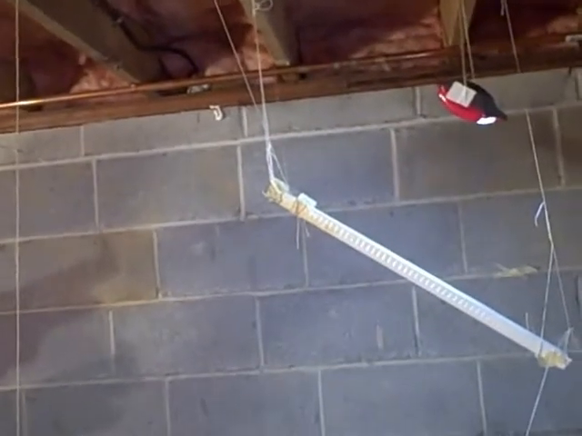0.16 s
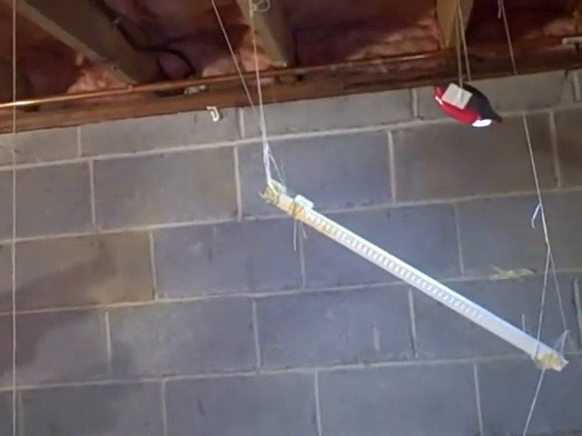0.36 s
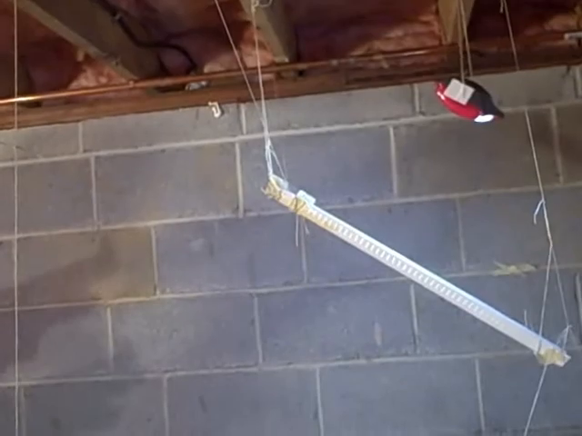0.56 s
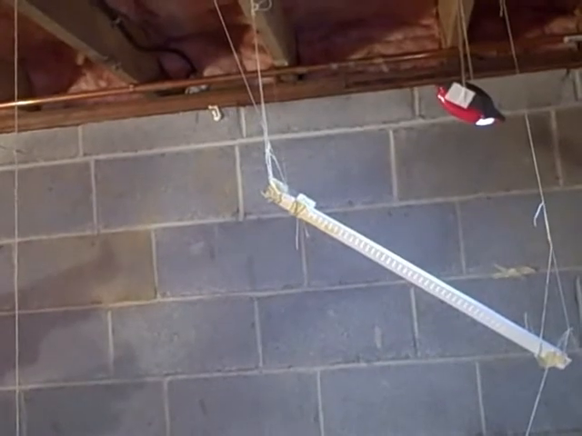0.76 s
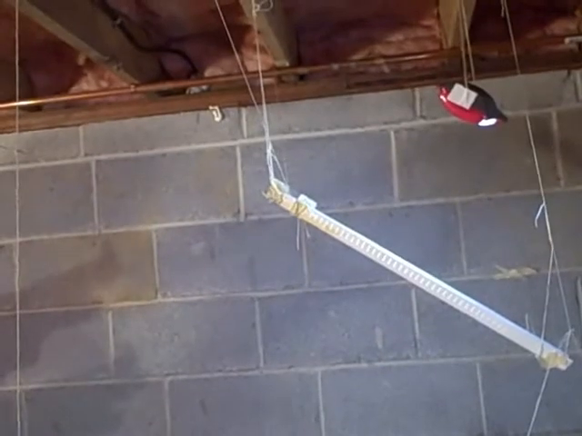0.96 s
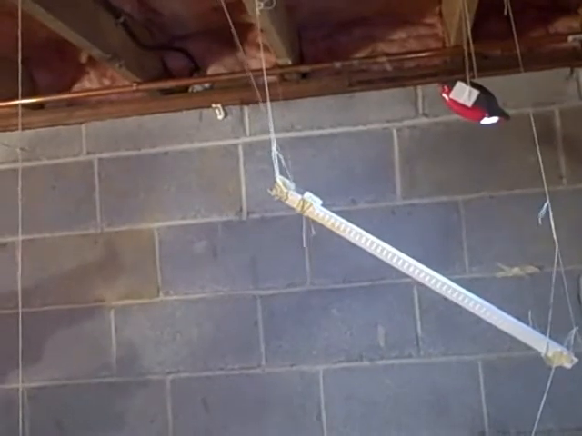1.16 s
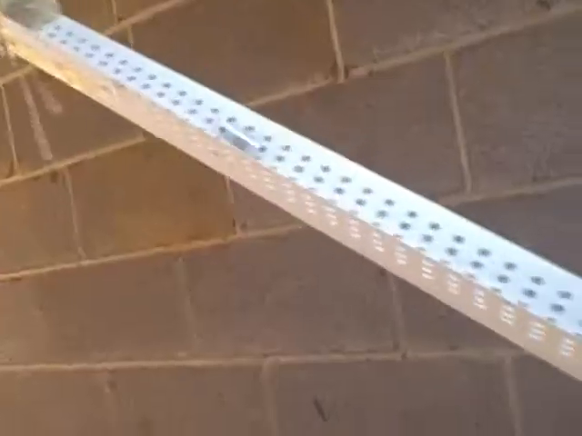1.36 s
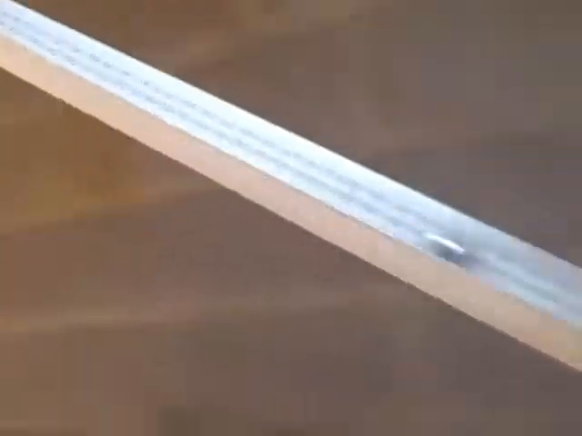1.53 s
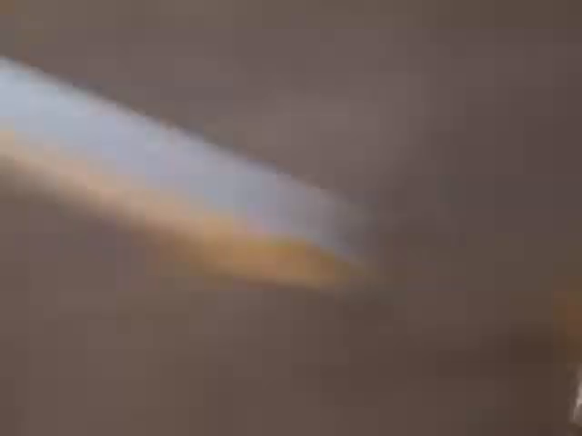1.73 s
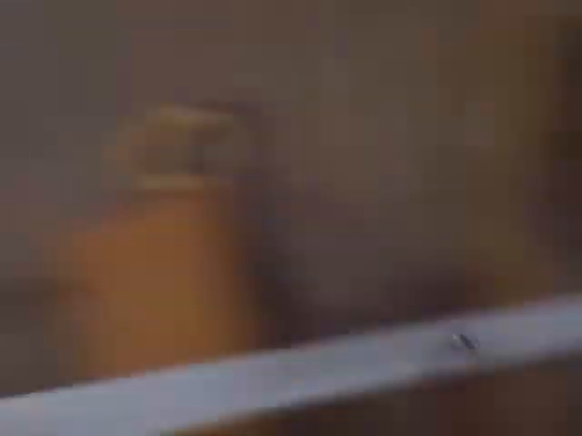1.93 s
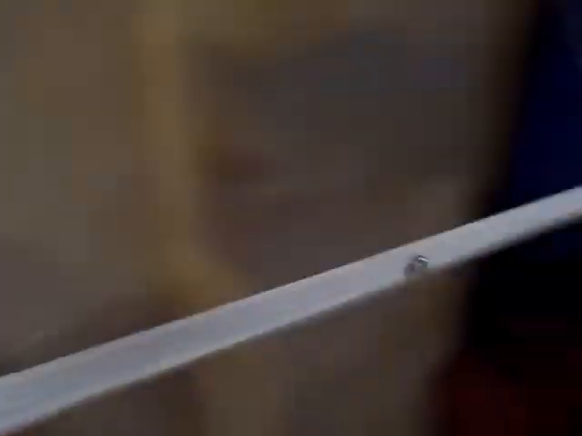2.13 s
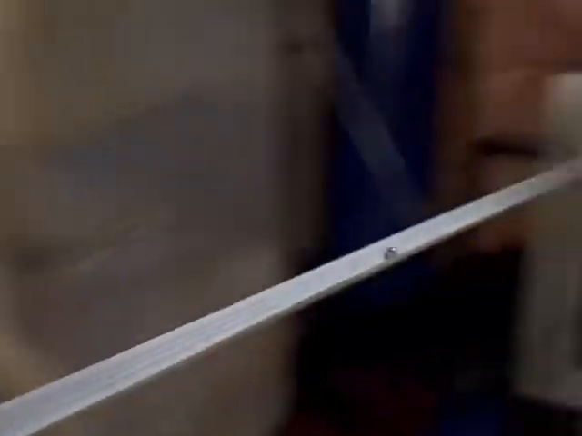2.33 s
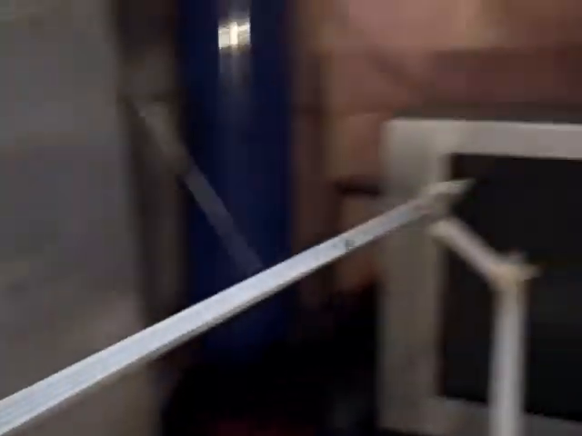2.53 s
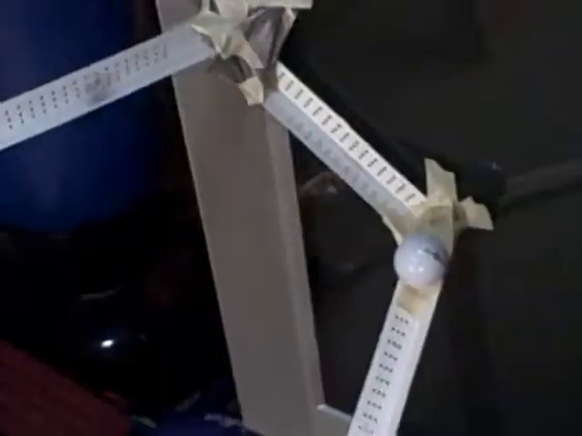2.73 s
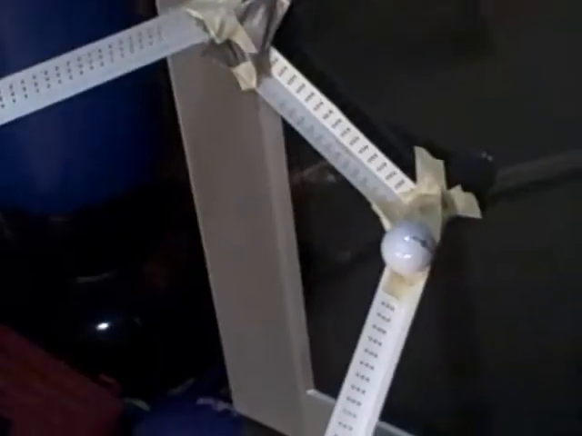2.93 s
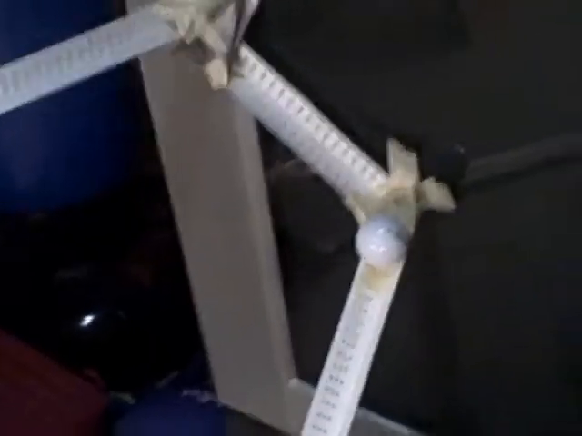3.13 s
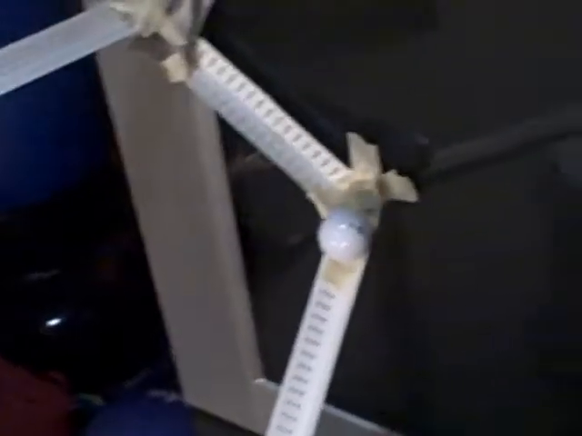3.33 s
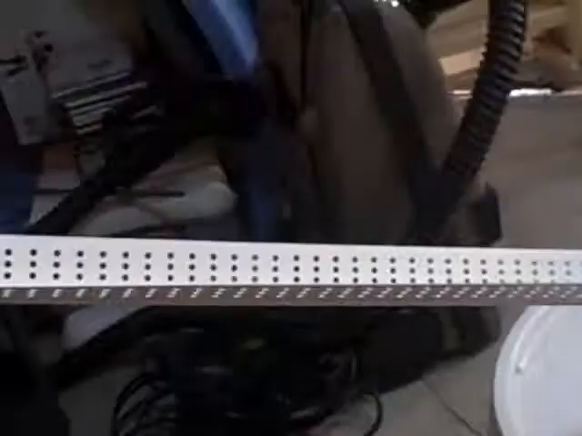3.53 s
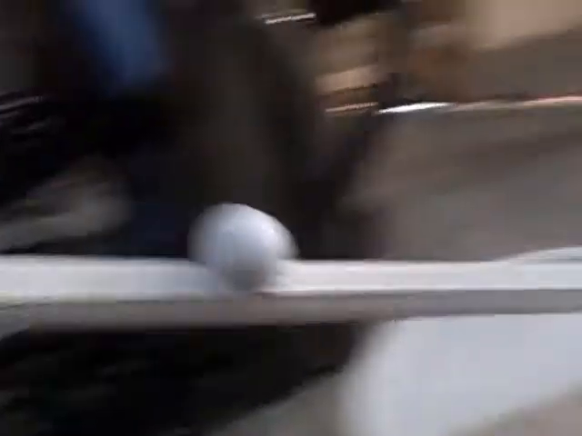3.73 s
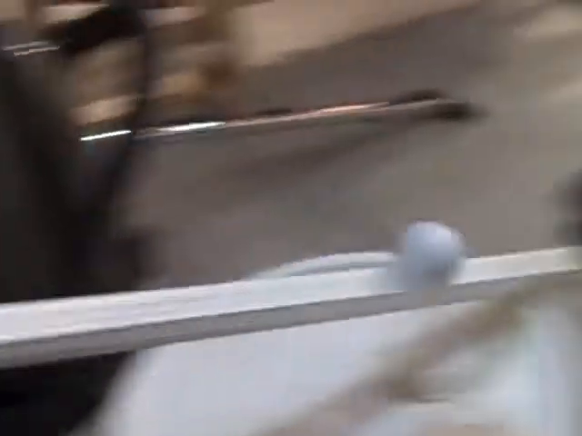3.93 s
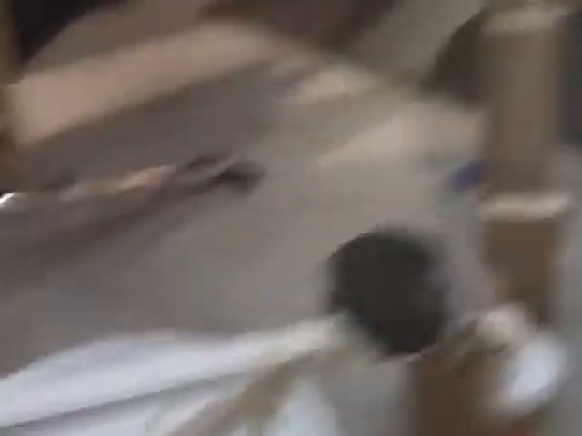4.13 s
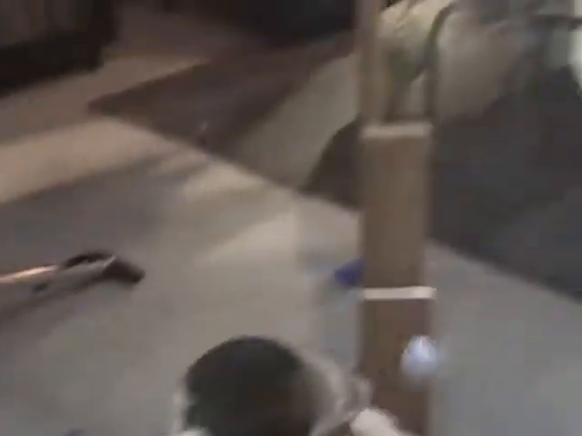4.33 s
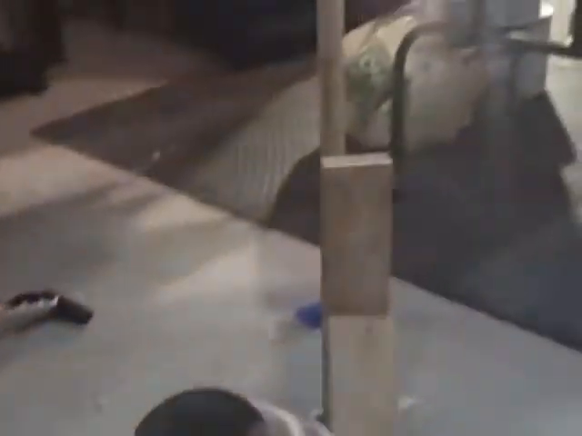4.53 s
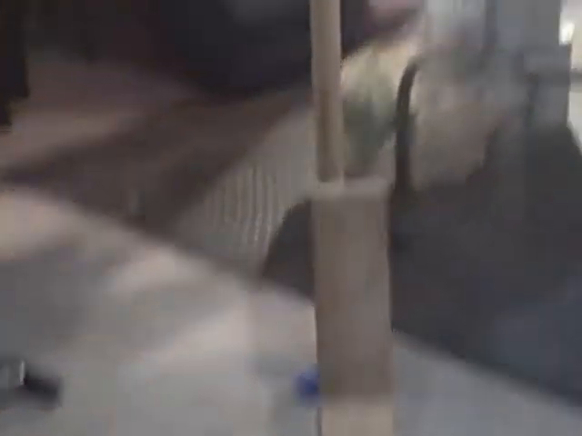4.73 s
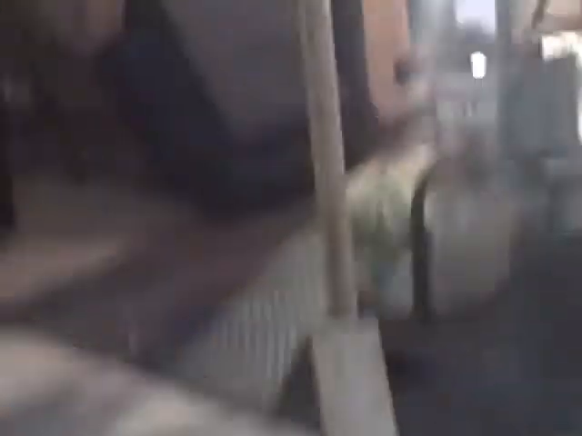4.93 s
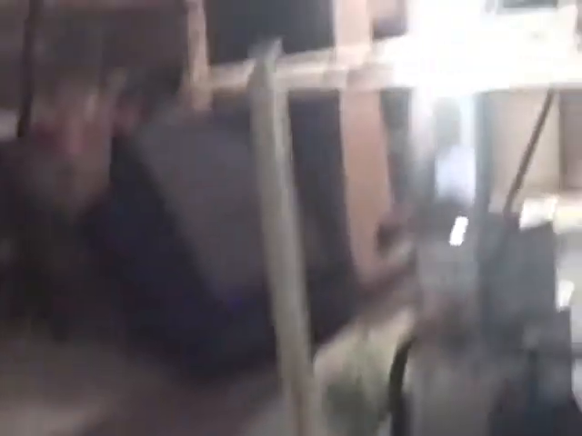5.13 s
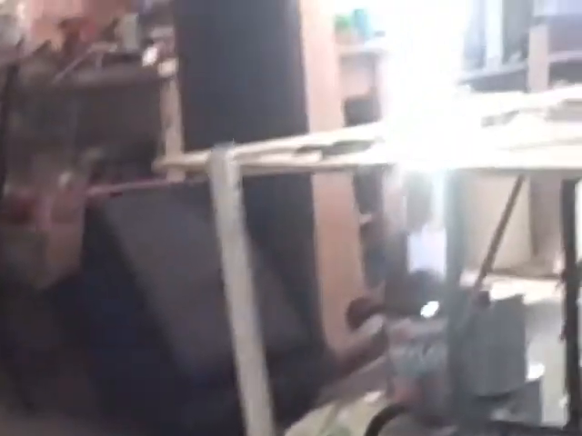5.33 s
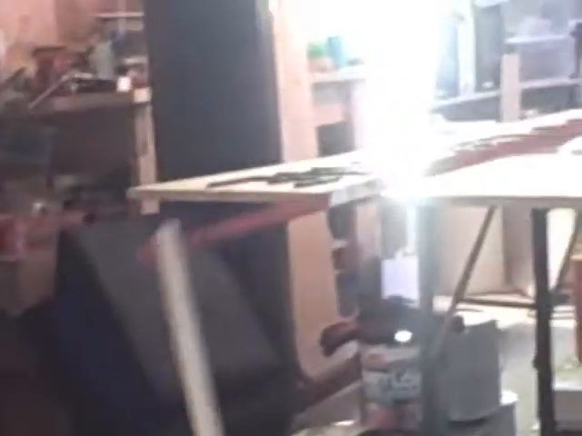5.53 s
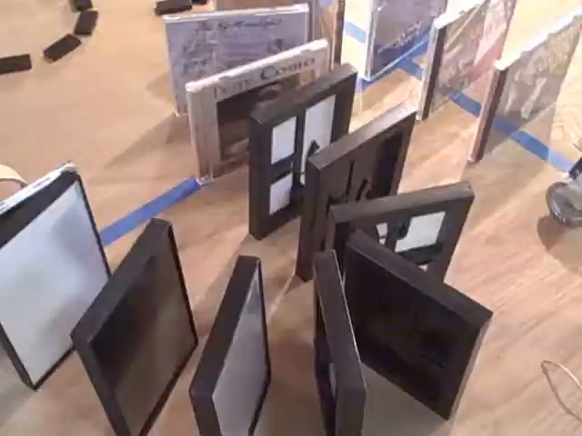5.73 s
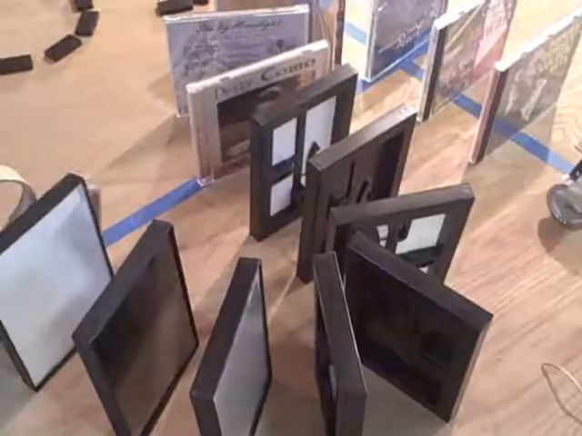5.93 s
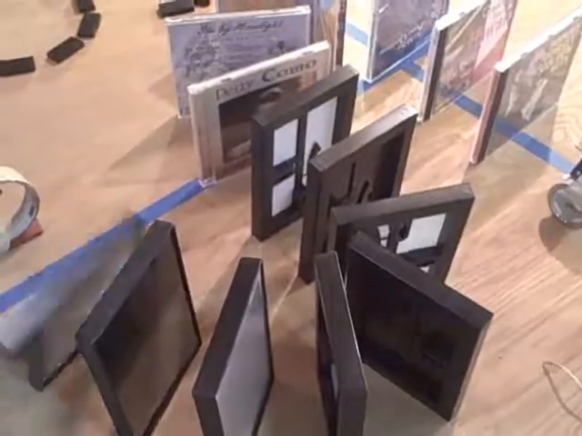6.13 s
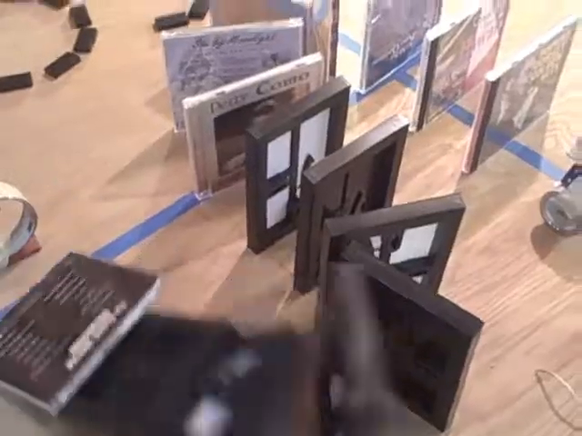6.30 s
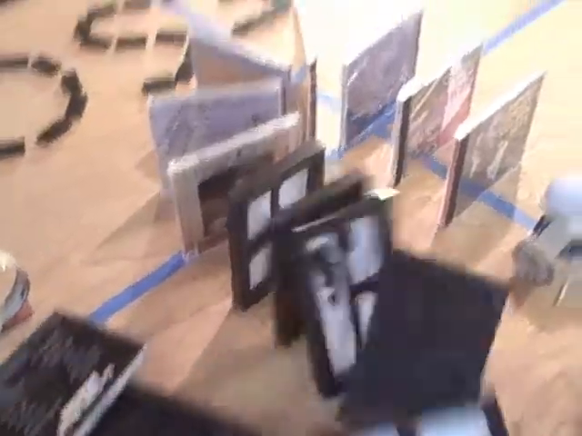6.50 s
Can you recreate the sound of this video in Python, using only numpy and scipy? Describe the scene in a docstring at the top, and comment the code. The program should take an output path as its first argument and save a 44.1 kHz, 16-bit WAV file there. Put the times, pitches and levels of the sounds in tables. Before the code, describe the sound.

Near-silent basement, a catch snaps, balls buzz and tap along rails, wooden pieces knock and slide, and a row of hollow cases slaps down.

```python
"""A home-made chain reaction in a basement, over faint room tone. Dry ticks, then a catch snaps open: shaped
noise bursts and decaying modes. A steel ball taps the holes of plastic rails, nudges a golf ball, and the frame
thumps with falling pitch. The golf ball patters and hums into a lever; blocks and a stick knock, squeak and slip
on a board as grit through modes. A case tips, and a row of plastic cases clatters down, loud, with more room
around it than the rails have."""
import sys
import numpy as np
from scipy import signal
from scipy.fft import rfft, irfft
from scipy.io import wavfile
from scipy.ndimage import uniform_filter1d, map_coordinates

SR = 44100
rng = np.random.default_rng(int(sys.argv[2]) if len(sys.argv) > 2 else 0)


def store_pcm(level_fs):
    """Save levels as 16-bit WAV."""
    pcm = np.round(np.clip(level_fs, -1, 1) * 32767).astype(np.int16)
    wavfile.write(sys.argv[1], SR, np.atleast_2d(pcm).T)


N = 293706
TIME = np.arange(N) / SR  # s


def undb(db):
    """Decibels to gain."""
    return 10 ** (np.asarray(db) / 20)


def unit(x):
    """Scale to rms 1."""
    return x / np.sqrt(np.mean(x ** 2) + 1e-20)


def decay(t, t60):
    """Exponential decay that reaches -60 dB at t60."""
    return np.exp(-np.log(1000) * t / t60)


def add(out, s, x):
    """Mix a sound in at time s."""
    i = int(s * SR)
    out[i:i + len(x)] += x[:N - i]


def through(x, response):
    """Pass a sound through an impulse response."""
    return signal.fftconvolve(x, response)[:len(x)]


def body(points, size=2048):
    """Minimum-phase impulse response with a spectrum of (Hz, dB) points."""
    hz, db = np.transpose(points)
    grid = np.maximum(np.fft.rfftfreq(size, 1 / SR), 1)
    cepstrum = irfft(np.log(undb(np.interp(np.log(grid), np.log(hz), db))))
    # fold the cepstrum onto positive time
    cepstrum[1:size // 2] *= 2
    cepstrum[size // 2 + 1:] = 0
    return irfft(np.exp(rfft(cepstrum)))


def ring(modes, scatter_db=0., detune=0.):
    """Decaying modes with random signs; strengths and pitches may scatter."""
    t = TIME[:SR // 2]
    tones = np.zeros(len(t))
    for hz, db, t60 in modes:
        strength, shift, sign = rng.standard_normal(3)
        envelope = undb(db + scatter_db * strength - 60 * t / t60)
        tones += envelope * np.sign(sign) * np.sin(2 * np.pi * hz * (1 + detune * shift) * t)
    return tones * np.minimum(1, 10 * (t[-1] - t))  # fade over the last 0.1 s


def contact(t60, snap, rough, rise, hold):
    """Force of a blow: one sharp touch, then chatter that dies; its energy is that of 20 ms at rms 1."""
    t = TIME[:SR // 4]
    noise, steps = rng.standard_normal((2, len(t)))
    age = t / max(t60, .002)
    envelope = (1 - np.exp(-age / rise)) * decay(age ** hold, 1)
    unevenness = np.exp(rough * np.repeat(steps, 16)[:len(t)])
    chatter = noise * unevenness * envelope
    force = chatter / np.linalg.norm(chatter)
    force[0] = snap
    return force / np.linalg.norm(force) * np.sqrt(.02 * SR)


def grit(rate, spread_db):
    """Random tiny contacts of uneven size, so many a second."""
    touches = (rng.random(N) < rate / SR) * rng.standard_normal(N)
    return unit(touches * undb(spread_db * np.clip(rng.standard_normal(N), -2, 2)))


def walk(rate):
    """Random levels, so many a second, joined by straight lines."""
    return np.interp(TIME * rate, np.arange(1000), rng.standard_normal(1000))


def held(start, end, attack, release):
    """Envelope that rises from start, holds until end and dies away."""
    return np.clip((TIME - start) / attack, 0, 1) * np.exp(-np.maximum(TIME - end, 0) / release)


def elapsed(start, end):
    """Seconds since start, standing still after end."""
    return np.clip(TIME, start, end) - start


SPEED_LAW = 1.26  # rolling amplitude grows as this power of speed
ROLL_ATTACK_S, ROLL_RELEASE_S = 0.026, 0.016


def roll(start, end, first, last):
    """Speed and amplitude of a ball under steady acceleration."""
    speed = np.interp(TIME, [start, end], [first, last])
    return speed, speed ** SPEED_LAW * held(start, end, ROLL_ATTACK_S, ROLL_RELEASE_S)


def basement(x, wet_db, t60_low, t60_high):
    """Floor and block walls answer with a short tail that loses its treble first."""
    t = TIME[:SR // 2]
    low_pass = signal.butter(2, 3000, fs=SR, output="sos")
    high_pass = signal.butter(2, 3000, "high", fs=SR, output="sos")
    low = signal.sosfilt(low_pass, rng.standard_normal(len(t)))
    high = signal.sosfilt(high_pass, rng.standard_normal(len(t)))
    tail = low * decay(t, t60_low) + 0.56 * high * decay(t, t60_high)
    tail *= np.clip(t / 0.004 - 1, 0, 1)  # silent for 4 ms, full at 8 ms
    return x + undb(wet_db) * through(x, tail / np.linalg.norm(tail))


# Spectrum of the room tone. Each row: frequency in Hz, density in dB per Hz.
ROOM_TONE = [(13, -30.5), (22, 3.5), (42, -2.5), (54, -3), (113, -2.5), (243, -10), (567, -13), (1030, -19),
             (4900, -26), (10800, -29.5), (15000, -30)]
ROOM_TONE_DB = -65


def room_tone():
    """Steady background: white noise through a fixed spectrum."""
    return undb(ROOM_TONE_DB) * unit(through(rng.standard_normal(N), body(ROOM_TONE, size=8192)))


# Faint ticks of the waiting rig and settling blocks. Each row: start in seconds, level in dB, pitch in Hz.
TICKS = [(.042, -56, 4000), (.489, -41.5, 1360), (0.577, -50.5, 1380), (0.735, -50.5, 1550),
         (0.871, -49.5, 1900), (.955, -47.5, 1410), (4.437, -37.5, 2160)]


def ticks():
    """Tiny dry ticks, a few cycles long."""
    out, t = np.zeros(N), TIME[:SR // 50]
    age = t / 0.00043
    for s, db, hz in TICKS:
        add(out, s, undb(db) * age * np.exp(1 - age) * np.sin(2 * np.pi * hz * t))
    return out


# The frame sags under the balls.
# Each row: start in seconds, level in dB, first pitch in Hz, last pitch in Hz, t60 in seconds.
THUMPS = [(3.382, -35, 190, 122, 0.26), (3.408, -25, 150, 99.5, 0.04), (3.445, -32.5, 119, 107, 0.083)]


def thumps():
    """The rail flexes; its quicker waves arrive first, so the pitch falls."""
    out, t = np.zeros(N), TIME[:SR // 3]
    for s, db, first_hz, last_hz, t60 in THUMPS:
        hz = last_hz + (first_hz - last_hz) * np.exp(-t / 0.013)
        envelope = decay(t, t60) * (1 - np.exp(-t / 0.0031))
        add(out, s, undb(db) * envelope * np.sin(2 * np.pi * np.cumsum(hz) / SR))
    return out


SLIP_ATTACK_S, SLIP_RELEASE_S, SLIP_SAG_DB_PER_S = 0.031, .03, 2
SQUEAK_START_S, SQUEAK_END_S, SQUEAK_DB, SQUEAK_HZ = 4.71, 4.96, -68, 3190


def squeak():
    """Uneven slips keep one note of the leaning stick sounding, with its octave."""
    note = ring([(SQUEAK_HZ, 0, .045), (2 * SQUEAK_HZ, -12, .02)])
    gain = held(SQUEAK_START_S, SQUEAK_END_S, SLIP_ATTACK_S, SLIP_RELEASE_S)
    level = undb(SQUEAK_DB + 2.4 * walk(20))
    return gain * level * unit(through(grit(rate=1600, spread_db=5.5), note))


# Slips of the stick and the board. Each row: start in seconds, end in seconds, level in dB.
SLIPS = [(4.597, 4.936, -66), (4.968, 5.075, -47), (5.134, 5.515, -52.5), (5.535, 5.613, -51),
         (5.624, 5.711, -62.5)]
# Spectrum of sliding wood. Each row: frequency in Hz, density in dB per Hz.
SLIDE_COLOUR = [(40, -16), (80, -5.5), (140, -1.5), (190, 1.5), (320, -11.5), (550, -9), (800, -12),
                (1350, -11.5), (2300, -22.5), (4500, -18.5), (8000, -26), (12600, -24.5), (15000, -32)]
# Modes of the board. Each row: frequency in Hz, level in dB, t60 in seconds.
BOARD = [(140.6, -16.5, 0.6), (190.6, -19, 0.46), (537.5, -2, .2), (980, -1, 0.13), (1030, 0, 0.2),
         (1344, 4, 0.12), (1440, -9, 0.17), (1656, -4, 0.2), (1860, -13, 0.25), (2010, -4, .15),
         (2390, -6.5, 0.24), (2673, 2, 0.079)]


def slide():
    """Wood slips over wood in fine catches that keep the board sounding; friction slows each slip."""
    gain = np.zeros(N)
    for start, end, db in SLIPS:
        level = undb(db - SLIP_SAG_DB_PER_S * elapsed(start, end))
        gain += level * held(start, end, SLIP_ATTACK_S, SLIP_RELEASE_S)
    catches = grit(rate=2400, spread_db=3) * undb(3 * walk(30))
    rub = unit(through(catches, body(SLIDE_COLOUR)))
    board = unit(through(catches, ring(BOARD, detune=0.0092)))
    return gain * (rub + undb(-5.5) * board)


# Modes of the catch. Each row: frequency in Hz, level in dB, t60 in seconds.
CATCH = [(950, -5.5, 0.34), (339, 2.5, 0.074), (200, -0.5, 0.072), (1842, 5, 0.084), (2670, 0.5, .08)]
# Modes of the ball. Each row: frequency in Hz, level in dB, t60 in seconds.
BALL = [(14150, 2.5, 0.023)]
# Modes of the lever. Each row: frequency in Hz, level in dB, t60 in seconds.
LEVER = [(528, -1.3, 0.097), (582, -1.1, 0.069), (654, -1.1, 0.032)]
# Modes of the base. Each row: frequency in Hz, level in dB, t60 in seconds.
BASE = [(280, -1.1, 0.022), (413, 1, 0.048), (457, 0.26, 0.073)]
# Modes of a block. Each row: frequency in Hz, level in dB, t60 in seconds.
BLOCK = [(956, -1.5, 0.15), (1430, -1, 0.027), (1904, 6.5, 0.044), (2930, -5.5, .08), (3148, 3, 0.08),
         (6212, -6, 0.05)]
# Modes of the pin. Each row: frequency in Hz, level in dB, t60 in seconds.
PIN = [(4630, 0.0076, 0.065)]
# Blows that set parts ringing. Each row: start in seconds, level in dB, modes of the struck part.
RINGS = [(1.054, -34, CATCH), (1.332, -29, BALL), (4.161, -21.5, LEVER), (4.247, -24, LEVER),
         (4.292, -24.5, BASE), (4.347, -29.5, BLOCK), (4.574, -30.5, PIN), (4.983, -35.5, BOARD),
         (5.074, -49, BOARD), (5.222, -33.5, BOARD)]


def rings():
    """The struck parts ring on after the blow."""
    out = np.zeros(N)
    for s, db, modes in RINGS:
        add(out, s, undb(db) * ring(modes))
    return out


# Knocks of the catch, balls, blocks and sticks.
# Each row: start in seconds, t60 in seconds, thud in dB, knock in dB, clack in dB, click in dB.
KNOCKS = [(.766, 0.064, -65, -52, -52.5, -62), (1.0435, .09, -58, -39.5, -35, -32.5),
          (1.0518, 0.012, -36, -30, -28, -29.5), (1.055, 0.18, -38.5, -42.5, -27.5, -30),
          (1.1505, 0.038, -70, -46, -39.5, -50.5), (3.7313, .014, -59, -44, -47, -64),
          (4.159, 0.035, -56.5, -32, -40, -40.5), (4.221, 0.046, -59, -42, -52, -46),
          (4.2372, 0.0051, -48, -42, -29, -32), (4.2397, 0.045, -48.5, -32.5, -26.5, -30.5),
          (4.289, 0.051, -42, -31, -38, -35.5), (4.301, 0.023, -30.5, -50, -49, -45.5),
          (4.3479, 0.034, -40, -27, -31, -43.5), (4.5624, 0.046, -47.5, -28.5, -56, -58),
          (4.574, 0.025, -44.5, -45.5, -40.5, -39), (4.6905, 0.02, -54, -34, -72.5, -64),
          (4.934, .032, -43, -40.5, -47.5, -41.5), (4.982, 0.05, -38.5, -33.5, -40, -47),
          (4.989, 0.13, -49, -48, -35.5, -35.5), (5.075, 0.11, -49, -49.5, -47, -54.5),
          (5.221, .07, -81, -37, -42, -54), (5.229, 0.044, -62, -39, -33.5, -58),
          (5.268, 0.035, -47, -39.5, -43.5, -43.5), (5.471, 0.17, -77, -52, -49.5, -52),
          (5.58, 0.019, -48.5, -41.5, -48, -48.5), (5.635, .15, -77, -56, -49.5, -52),
          (5.997, 0.033, -60, -43.5, -43, -42.5), (6.01, 0.1, -53, -48.5, -59, -64)]
# Registers of a knock: thud, knock, clack, click. Each row: centre in Hz, width in Hz.
REGISTERS = [(230, 420), (900, 1000), (2700, 3000), (8000, 9500)]


def knocks(blows):
    """Each blow chatters briefly into a body of its own colour."""
    out = np.zeros(N)
    centres, widths = np.transpose(REGISTERS)
    for s, t60, *levels in blows:
        db = levels - 10 * np.log10(2 * widths / SR)  # level of a register to density
        low_edge = [(35, db[0] - 21), (110, db[0] - .5)]
        high_edge = [(12500, db[-1] - 2.5), (16000, db[-1] - 20)]
        colour = [*low_edge, *zip(centres, db), *high_edge]
        add(out, s, through(contact(t60, snap=0.26, rough=0.32, rise=0.018, hold=0.94), body(colour)))
    return out


# The steel ball lands on a rail or jumps a joint.
# Each row: start in seconds, chatter t60 in seconds, level in dB.
LANDINGS = [(1.279, .021, -48), (1.292, 0.021, -48), (1.566, 0.0029, -49), (1.773, 0.0047, -44),
            (1.9251, 0.01, -35), (1.932, .11, -37), (2.001, 0.041, -44.5), (2.091, 0.048, -43),
            (3.0017, 0.034, -46), (3.327, 0.039, -51.5), (3.392, 0.024, -51)]
# Spectrum of a landing. Each row: frequency in Hz, density in dB per Hz.
LANDING_COLOUR = [(35, -18), (230, -6), (900, -4.5), (2700, 1), (8000, 1.5), (12500, -11), (16000, -23)]
# Modes of the rail. Each row: frequency in Hz, level in dB, t60 in seconds.
RAIL = [(1272, -2.5, 0.043), (1612, -11, 0.084), (1650, -2, 0.086), (4140, 3.5, 0.022), (4504, 3, 0.035)]


def landings():
    """The steel ball drops on the plastic, chatters and sets the rail ringing."""
    force = np.zeros(N)
    for s, t60, db in LANDINGS:
        add(force, s, undb(db) * contact(t60, snap=0.43, rough=0.12, rise=0.012, hold=1.06))
    shell, modes = body(LANDING_COLOUR), ring(RAIL)
    clatter = through(force, shell / np.linalg.norm(shell))
    return clatter + undb(-8.5) * through(force, modes / np.linalg.norm(modes))


# Spectrum of the steep rail. Each row: frequency in Hz, density in dB per Hz.
STEEP_COLOUR = [(70, -29.5), (150, -13), (350, -1), (900, -14), (1600, -4), (2800, -10.5), (4200, -0.5),
                (5400, -3.5), (7400, -1.5), (9500, -14.5), (13000, -10.5), (15000, -33)]
# Spectrum of the shallow rail. Each row: frequency in Hz, density in dB per Hz.
SHALLOW_COLOUR = [(70, -16), (150, -18.5), (550, -4), (950, -11.5), (1650, -1.5), (2800, -6), (4250, 0.5),
                  (5300, -2.5), (7000, -1), (8500, 1.5), (9600, -10.5), (13500, -6.5), (15000, -21)]
# Spectrum of the last rail. Each row: frequency in Hz, density in dB per Hz.
LAST_COLOUR = [(70, -19), (150, 0), (400, 2), (800, -1.5), (1100, -4), (2100, 3), (3000, -6.5), (4300, 0),
               (6000, -3), (8500, -8), (12500, -15), (15000, -13)]
# Runs of the steel ball, each at steady acceleration.
# Each row: start in seconds, end in seconds, first speed in holes/s, last speed in holes/s,
# level in dB at REFERENCE_HOLES_PER_S, fade in dB/s (negative swells), spectrum of the rail.
RUNS = [(1.279, 1.785, 41.8, 105.6, -47, -1.5, STEEP_COLOUR),
        (1.952, 2.144, 52, 76.5, -46.5, -9, SHALLOW_COLOUR),
        (2.174, 2.671, 115, 168, -48.5, 21, SHALLOW_COLOUR), (2.669, 3.038, 80, 55, -55, -5.5, LAST_COLOUR),
        (3.17, 3.368, 48, 90, -51.5, -7, LAST_COLOUR), (3.381, 3.542, 77, 45.5, -52.5, 2, LAST_COLOUR)]
REFERENCE_HOLES_PER_S = 100
RAIL_RING_DB = -9  # against the direct sound
GRAIN_SHARE = 0.48  # fine roughness of the rail, against the taps of the holes


def steel_ball(start, end, first, last, db, fade_db_per_s, colour):
    """The ball drops into each hole of the rail and bounces on its rims, louder the faster it runs."""
    speed, gain = roll(start, end, first / REFERENCE_HOLES_PER_S, last / REFERENCE_HOLES_PER_S)
    rate = speed * REFERENCE_HOLES_PER_S
    holes = np.flatnonzero(np.diff(np.floor(np.cumsum(rate) / SR)))
    # three taps a hole, at random delays and sizes
    late, size = rng.standard_normal((2, 2000, 3))[:, :len(holes)]
    places = holes[:, None] + (0.0025 * SR * np.cumsum(abs(late), axis=1)).astype(int)
    sizes = undb(4.1 * np.clip(size, -2, 1.6))
    taps = np.bincount(places.ravel(), sizes.ravel(), N)[:N] / np.sqrt(rate)
    # each tap dies in a short buzz
    buzz = through(taps, np.exp(-TIME[:SR // 50] / 0.0017)) * rng.standard_normal(N)
    wobble = undb(1.24 * walk(37.8) / speed)  # a slow ball sways more from rim to rim
    grain = grit(rate=2500, spread_db=6.5)
    force = (unit(taps) + 0.68 * unit(buzz) + GRAIN_SHARE * grain) * wobble
    direct = unit(through(force, body(colour)))
    ringing = unit(through(force, ring(RAIL)))
    level = undb(db - fade_db_per_s * elapsed(start, end))
    return gain * level * (direct + undb(RAIL_RING_DB) * ringing)


# The steel ball nudges the golf ball, close to the microphone.
# Each row: start in seconds, t60 in seconds, thud in dB, knock in dB, clack in dB, click in dB.
NUDGES = [(3.0623, .01, -51, -44, -41, -41.5), (3.1263, 0.01, -74, -58, -48.5, -56),
          (3.1287, 0.027, -63, -58, -54, -50.5), (3.409, 0.022, -57, -54, -46, -44),
          (3.7271, .012, -69, -40.5, -42, -50.5)]
# Modes of the golf ball on its rail. Each row: frequency in Hz, level in dB, t60 in seconds.
GOLF = [(420, -7, 0.012), (680, -3, 0.013), (1650, 2, 0.015), (2030, 4, 0.014), (2500, 0.5, 0.016)]
GOLF_RING_DB = 10  # against the clack of the nudge


def nudges():
    """The steel ball clicks against the golf ball, which answers with a short, hollow pock."""
    out = knocks(NUDGES)
    for s, _, _, _, clack_db, _ in NUDGES:
        add(out, s, undb(clack_db + GOLF_RING_DB) * ring(GOLF))
    return out


# Rolls of the golf ball, down its rail and then along the lever. Each row: start in seconds, end in seconds,
# first speed in m/s, last speed in m/s, patter level in dB at 1 m/s, hum level in dB at the end.
GOLF_ROLLS = [(3.545, 4.086, .42, 0.96, -48, -50), (4.173, 4.407, 0.99, 0.27, -47.5, -54.5)]
# Spectrum of the patter. Each row: frequency in Hz, density in dB per Hz.
GOLF_COLOUR = [(71, -30.5), (120, -3.5), (173, -7.5), (535, -5.5), (629, -6), (1560, -8), (3170, -14.5),
               (4120, -6), (4650, -11), (10000, -15.5), (13000, -13), (15000, -18.5)]
HUM_RISE_DB_PER_S = 62.5  # the hum swells as the ball nears the end
HUM_LAW = 0.58  # hum pitch grows as this power of speed


def golf_ball():
    """Dimples patter on the rail, and the lever at its end hums, higher as the ball runs faster."""
    dimples = grit(rate=850, spread_db=2) + 0.72 * rng.standard_normal(N)
    patter = unit(through(dimples, body(GOLF_COLOUR)))
    hum = unit(through(dimples, ring(LEVER)))
    out = np.zeros(N)
    for start, end, first, last, db, hum_db in GOLF_ROLLS:
        speed, gain = roll(start, end, first, last)
        # read the hum at a varying rate to bend its pitch
        gliding = map_coordinates(hum, [np.cumsum(speed ** HUM_LAW)], order=1, mode="mirror")
        nearness = undb(-HUM_RISE_DB_PER_S * np.maximum(end - TIME, 0))
        nearness *= held(start, end, ROLL_ATTACK_S, ROLL_RELEASE_S)
        out += undb(db) * gain * patter + undb(hum_db) * nearness * gliding
    return out


# Spectrum of the tipping case. Each row: frequency in Hz, density in dB per Hz.
TIPPING_COLOUR = [(80, -14.5), (170, -0.5), (350, -7), (650, 0), (1100, 1), (2100, -13.5), (3500, -22.5),
                  (14000, -33)]
TIP_START_S, TIP_END_S, TIP_RELEASE_S = 6.02, 6.26, 0.075
TIP_DB, TIP_RISE_DB_PER_S = -43.5, 130  # level at the end, swell before it


def tipping():
    """The first case slides on its edge, swelling as it leans over towards the next."""
    swell = undb(TIP_DB - TIP_RISE_DB_PER_S * np.maximum(TIP_END_S - TIME, 0))
    gain = swell * held(TIP_START_S, TIP_END_S, SLIP_ATTACK_S, TIP_RELEASE_S)
    return gain * unit(through(grit(rate=12000, spread_db=7.5), body(TIPPING_COLOUR)))


# Cases slapping each other.
# Each row: start in seconds, rattle t60 in seconds, level in dB, relative brightness in dB.
CASES = [(6.232, 0.025, -35.5, -7), (6.27, 0.023, -55, 8), (6.291, 0.045, -32.5, -0.5),
         (6.317, 0.016, -26, 3.5), (6.3658, 0.029, -23.5, 2), (6.3871, 0.042, -31, -3.5),
         (6.433, 0.1, -32, -12), (6.446, 0.04, -32.5, 2), (6.48, 0.054, -25.5, -2),
         (6.5084, 0.039, -22.5, 2.5), (6.5312, 0.063, -20.5, 2.5), (6.545, 0.072, -21, -2),
         (6.557, 0.0093, -29, 2), (6.579, 0.047, -18.5, 1.5), (6.585, 0.067, -24.5, -1),
         (6.608, 0.096, -45, 14), (6.6252, 0.046, -24, 0), (6.631, 0.015, -26.5, -3.5),
         (6.647, 0.037, -41, 3)]
# Spectrum of a case. Each row: frequency in Hz, density in dB per Hz.
CASE_COLOUR = [(30, -9), (80, -14), (200, -3.5), (350, -4), (520, -16), (750, -3), (1300, -3.5), (2000, 3),
               (2700, 4.5), (3700, -1), (6000, -8), (11500, -14), (13400, -16), (15000, -60)]
# Modes of a case. Each row: frequency in Hz, level in dB, t60 in seconds.
CASE = [(504, -4.5, 0.19), (1640, -22, 0.12), (1845, 7, 0.05), (2060, 7, 0.028), (2395, 9, 0.032),
        (2594, -17, 0.076), (2740, 10, 0.023), (2800, -11, 0.055), (3400, -9, 0.053), (3350, 9, 0.041),
        (4500, 12, 0.054)]
SCRAPE_DB, PILE_LAW = -47, 0.58  # scrape amplitude grows as this power of the slaps so far


def cases():
    """Hollow cases slap together, their loose lids buzz, and they scrape more as more of them lean."""
    out = np.zeros(N)
    hz, db = np.transpose(CASE_COLOUR)
    treble = np.clip(np.log2(hz / 3200), 0, 1)  # 0 below 3200 Hz, 1 an octave up
    for s, t60, level_db, bright_db in CASES:
        force = contact(t60, snap=0.025, rough=0.22, rise=0.045, hold=0.81)
        shell = body(np.c_[hz, db + (bright_db + 4.5) * treble]) / np.linalg.norm(body(CASE_COLOUR))
        modes = ring(CASE, scatter_db=4, detune=.006)
        slap = undb(1.0) * through(force, shell)
        ringing = undb(-11.0) * through(force, modes / np.linalg.norm(modes))
        add(out, s, undb(level_db) * (slap + ringing))
    leaning = sum(TIME > s for s, *_ in CASES)
    scrape = through(grit(rate=4400, spread_db=3), body(np.c_[hz, db - 4 * treble]))
    return out + undb(SCRAPE_DB) * leaning ** PILE_LAW * unit(scrape)


def scene():
    """All the stages in one room, over its faint background; the rails are nearest and so sound driest."""
    rails = landings() + nudges() + sum(steel_ball(*run) for run in RUNS) + golf_ball()
    parts = ticks() + knocks(KNOCKS) + rings() + thumps() + squeak() + slide() + tipping() + cases()
    near = basement(rails, wet_db=-21, t60_low=0.56, t60_high=0.36)
    far = basement(parts, wet_db=-14.5, t60_low=0.23, t60_high=0.18)
    return (near + far + room_tone())[None]


def suppressor(x, knee_db, max_cut_db):
    """Noise suppression: turns the sound down as its own level sinks; a third of the cut at the knee."""
    power = uniform_filter1d(x ** 2, SR // 80)
    level_db = 10 * np.log10(np.maximum(power, 1e-14))
    return x * undb(-max_cut_db / (1 + 2 * np.exp((level_db - knee_db) / 3)))


def record(dry):
    """The recorder hushes the quietest tails, rounds the loudest peaks and cuts the top."""
    ceiling, top_hz = .7, 14800
    hushed = suppressor(dry, knee_db=-62.5, max_cut_db=9)
    rounded = ceiling * np.tanh(hushed / ceiling)
    return signal.sosfilt(signal.ellip(8, .2, 70, top_hz, fs=SR, output="sos"), rounded)


dry = scene()
out = record(dry)
store_pcm(out)
```